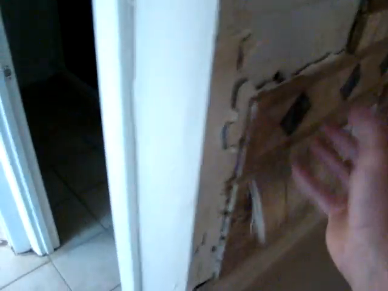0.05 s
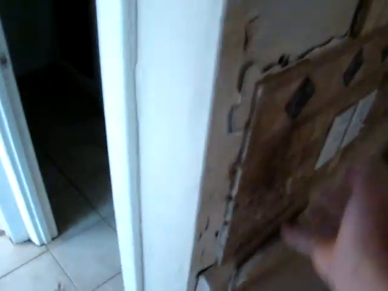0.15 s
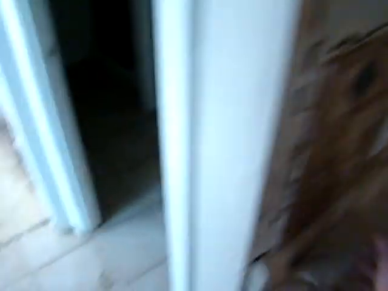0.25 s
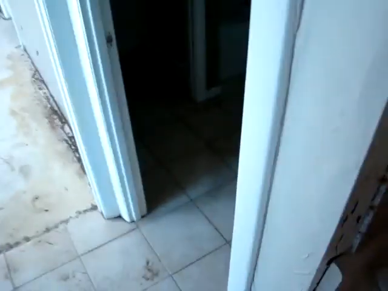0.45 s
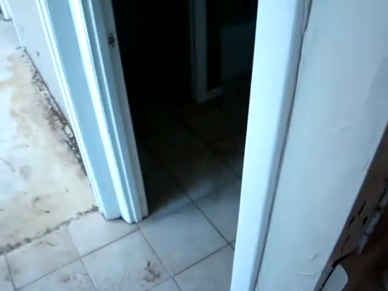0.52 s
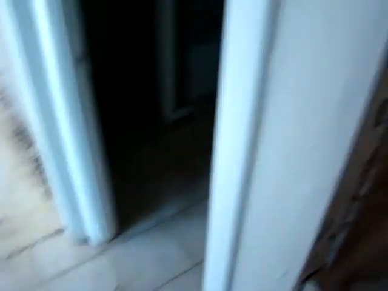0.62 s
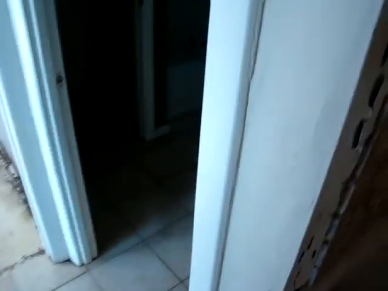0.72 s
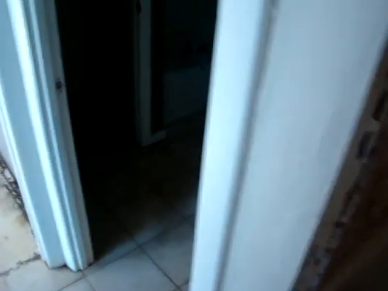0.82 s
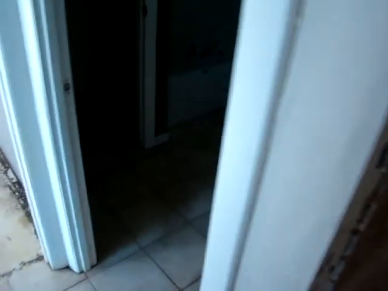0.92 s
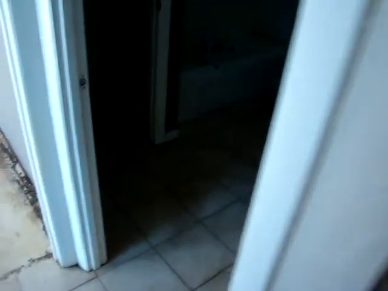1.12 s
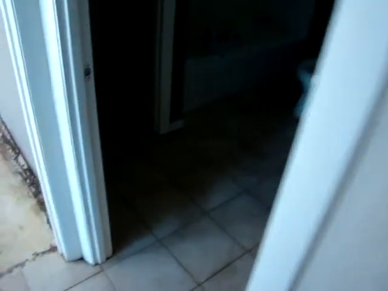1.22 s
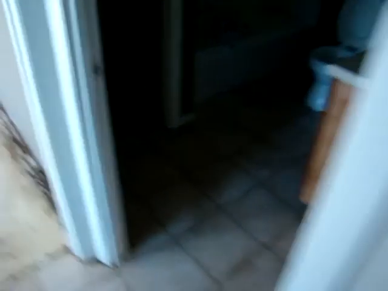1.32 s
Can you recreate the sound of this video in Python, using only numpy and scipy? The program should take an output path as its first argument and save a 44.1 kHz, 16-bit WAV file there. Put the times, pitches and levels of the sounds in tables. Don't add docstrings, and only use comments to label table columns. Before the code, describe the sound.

Close to a hissy small camera microphone, faint rubbing and crumbling mortar lead to a sudden tile crack and slightly overloaded crash, pieces bouncing again, then a long hollow indoor reverberation with a few gritty ticks.

```python
import sys
import numpy as np
from scipy import signal
from scipy.fft import rfft, irfft, next_fast_len
from scipy.io import wavfile
from scipy.ndimage import uniform_filter1d

SR = 44100
rng = np.random.default_rng(int(sys.argv[2]) if len(sys.argv) > 2 else 0)


def level_to_linear(level):
    exponent = np.asarray(level, float) / 20
    return 10 ** exponent


def digitize_waveform(pressure):
    field = np.atleast_2d(pressure).T
    bounded = np.clip(field, -1, 1)
    quanta = np.round(bounded * 32767).astype(np.int16)
    wavfile.write(sys.argv[1], SR, quanta)


N = 59535


def unit(x):
    return x / np.sqrt(np.mean(x ** 2) + 1e-20)


def along(points, hz):
    f, v = np.transpose(points)
    return np.interp(np.log(hz + 1), np.log(f + 1), v)


def filtered(x, response):
    m = next_fast_len(len(x) + 8192)
    return irfft(rfft(x, m) * response(np.fft.rfftfreq(m, 1 / SR)), m)[:len(x)]


def noise(colour):
    return unit(filtered(rng.standard_normal(N), lambda hz: level_to_linear(along(colour, hz))))


def causal(colour, tilt_db, size=4096):
    hz = np.fft.rfftfreq(size, 1 / SR)
    level_db = np.maximum(along(colour, hz), -70) + tilt_db * np.log2((hz + 50) / 1000)
    cepstrum = irfft(np.log(level_to_linear(level_db)), size)
    cepstrum[1:size // 2] *= 2
    cepstrum[size // 2 + 1:] = 0
    click = irfft(np.exp(rfft(cepstrum)), size)[:size // 2]
    return click / np.abs(click).max()


def tail(t60s, build_s):
    hz, t, z = signal.stft(rng.standard_normal(N), SR, nperseg=1024)
    decay = level_to_linear(-60 * t / along(t60s, hz)[:, None])
    h = signal.istft(z * decay, SR, nperseg=1024)[1][:N]
    h = h * (1 - np.exp(-np.arange(N) / (SR * build_s)))
    return h / np.linalg.norm(h)


def add(track, s, x):
    part = track[round(s * SR):][:len(x)]
    part += x[:len(part)]


def resonances(f, modes):
    return sum(level_to_linear(db) * 1j * f * w / (c * c - f * f + 1j * f * w) for c, w, db in modes)


def hall(f):
    # f/Hz, width/Hz, level/dB
    hall_modes = [(162, 14, 4), (252, 12, 9)]
    cut_hz = 155
    return (1j * f / (cut_hz + 1j * f)) * (1 + resonances(f, hall_modes))


def smash():
    blow_s = [.1385, .1495, .2495, .2645, .2692, .2732, .2772, .2855, .2955, .33, .4012, .4063, .415, .424,
              .435, .47, .497, .55]
    # level/dB, brightness/(dB/octave), rattle/dB, room/dB
    blows = [(-34, -2.5, 1.5, 5.5), (-34.5, 4, -12, 3.5), (-21, -4.5, 6, -2.5), (-4, -1, 8, 1.5),
             (-1.5, 1, -0.5, 1), (-9.5, 0.5, 7, 4.5), (-8.5, -0.5, 6, 0.5), (-5.5, 0, 5.5, 2.5),
             (-5, 0.5, 7, 3.5), (-9.5, -1, -12.5, -17), (-5, 1, 1.5, -5.5), (-7.5, 0.5, -0.5, -8.5),
             (-10, 1.5, 8, 0), (-11, -2, 3.5, 0), (-11.5, -0.5, 8.5, -5.5), (-12, -2, 10.5, -20),
             (-22, 0, 5, -14), (-32, -3, -9, -15)]
    # f/Hz, level/dB
    slab = [(35, -79), (60, -36), (246, -8.5), (362, -5), (521, -3), (871, -2.5), (1400, -1.5), (2710, -11),
            (10000, -32.5), (13000, -77.5), (22000, -120)]
    # f/Hz, level/dB
    pieces = [(35, -64), (60, -46), (257, -20), (600, -13), (1300, -9), (2150, 1), (3000, -8), (10000, -35)]
    # f/Hz, width/Hz, level/dB
    slab_modes = [(458.5, 9.2, -4), (644, 23, -7), (821, 19, -4.5), (929, 15, -3), (1172, 11, 3),
                  (1510, 15, -29), (2266, 12, -14)]
    # f/Hz, t60/s
    house = [(60, 1.1), (160, 0.82), (200, 0.84), (250, 1.21), (350, 1.294), (700, 1.417), (1500, 1.34),
             (3000, 1.113), (6000, 0.82), (10000, 0.76)]
    broken_s, rattle_t60_s, build_s, modes_db = .39, 0.057, 0.004, -1
    out, t = np.zeros(N), np.arange(SR // 10) / SR
    for s, (db, tilt_db, rattle_db, wet_db) in zip(blow_s, blows):
        clap = -causal(slab if s < broken_s else pieces, tilt_db)
        rattle = rng.standard_normal(len(t)) * rng.exponential(size=len(t))
        rattle = rattle * level_to_linear(-60 * t / rattle_t60_s)
        rattle = rattle / np.linalg.norm(rattle)
        add(out, s, level_to_linear(db) * clap)
        add(out, s, level_to_linear(db + rattle_db) * signal.fftconvolve(clap, rattle))
        add(out, s, level_to_linear(db + wet_db + 9.5) * signal.fftconvolve(clap, tail(house, build_s)))
    return filtered(out, lambda f: (1 + level_to_linear(modes_db) * resonances(f, slab_modes)) * hall(f))


def snaps():
    snap_s = [.1363, .1385, .150, .1815, .184, .2476, .2525, .8835, .8872, .8905, .8935, .9535, .191, .2445]
    snap_length_s = [.001, .006, .007, .003, .008, .002, .005, .003, .002, .0025, .0015, .001, .04, .003]
    snap_tilt_db = [1, 3, 1, 2, 0, -1, 3, 1.5, 3, 0, .5, 1, 2, 1]
    # click/dB, crumble/dB
    snap_levels = [(-19, -58), (-37.5, -33), (-38, -36.5), (-40, -26), (-37, -27.5), (-3.5, -10.5),
                   (-33, -15.5), (-24, -27.5), (-19.5, -54), (-16.5, -27.5), (-21, -37), (-38, -53),
                   (-47, -35), (-42.5, -37)]
    # f/Hz, level/dB
    snap_colour = [(60, -45), (300, -26), (1000, -14), (2500, -3), (4200, 3), (6500, 0), (8000, -5),
                   (9600, -1)]
    click_t60_s, wet_db, wet_t60_s, wet_build_s = .002, -9, .3, 0.0013
    out, t = np.zeros(N), np.arange(2000) / SR
    for s, length_s, tilt_db, (click_db, db) in zip(snap_s, snap_length_s, snap_tilt_db, snap_levels):
        chance = rng.standard_normal((3, len(t)))
        grit = level_to_linear(db) * chance[0] * chance[1] / (1 + (t / length_s) ** 6)
        grit += level_to_linear(click_db + 1.5 - 60 * t / click_t60_s) * chance[2]
        add(out, s, np.convolve(grit, causal(snap_colour, tilt_db)))
    echo = signal.fftconvolve(out, tail([(500, wet_t60_s)], wet_build_s))[:N]
    return out + level_to_linear(wet_db) * echo


def shard():
    # t/s, level/dB
    hit_s, hit_db = (.183, -37)
    # f/Hz, level/dB, t60/s
    shard_modes = [(825, 8.5, 0.066), (2090, 3.5, 0.46), (2950, -2, 0.18), (3203, -13, 0.54),
                   (3180, -1.5, 0.32), (3930, -7, 0.3), (5200, -20, 0.14)]
    onset_s = 0.0029
    out, t = np.zeros(N), np.arange(SR // 2) / SR
    wander = rng.standard_normal((2, len(shard_modes), len(t)))
    wander = unit(uniform_filter1d(uniform_filter1d(wander, 200), 100))
    ring = np.zeros(len(t))
    for (hz, db, t60_s), size, phase in zip(shard_modes, *wander):
        level = level_to_linear(db - 60 * t / t60_s + 4 * size)
        ring += level * np.sin(2 * np.pi * hz * t + 1.2 * phase)
    add(out, hit_s, level_to_linear(hit_db) * ring * (1 - np.exp(-t / onset_s)))
    return out


def hand(t):
    # t/s, level/dB, f/Hz
    grips = [(0.046, -58, 45), (0.147, -54.5, 90), (0.171, -57, 57), (.27, -61, 44.7), (.40, -52, 35),
             (.47, -65, 55.6), (.95, -61.5, 49.6), (0.998, -63, 70), (1.064, -62, 60), (0.252, -16, 377),
             (.2575, -18.5, 350), (1.07, -61, 140), (1.001, -59, 110)]
    out = np.zeros(N)
    for s, db, hz in grips:
        swell = np.exp(-.5 * ((t - s) * hz / 0.69) ** 2)
        out += level_to_linear(db) * swell * np.sin(2 * np.pi * hz * (t - s))
    return out


def swishes(t):
    # middle t/s, half length/s, level/dB
    swells = [
        (0.062, .025, -49),
        (.945, 0.08, -55),
    ]
    # f/Hz, level/dB
    swish_colour = [(300, -0.5), (1500, -22), (3700, -1.5), (7000, 1.5), (10000, -1.5)]
    swell = sum(level_to_linear(db) * np.exp(-.5 * ((t - s) / half_s) ** 2) for s, half_s, db in swells)
    return swell * noise(swish_colour)


def background():
    # f/Hz, level/dB
    bustle_colour = [(30, -32), (100, -6), (260, 4.5), (480, 7), (1000, -1.5), (2000, -5), (5000, -27.5),
                     (10000, -27)]
    # f/Hz, level/dB
    hiss_colour = [(30, -2.5), (300, -16), (3000, -3), (10000, -10.5)]
    bustle_db, bustle_t60_s, still_db, hiss_db = -56, 3.4, -60, -56
    t = np.arange(N) / SR
    fade = level_to_linear(bustle_db - 60 * t / bustle_t60_s) + level_to_linear(still_db)
    bustle = fade * unit(filtered(noise(bustle_colour), hall))
    return bustle + swishes(t) + hand(t) + level_to_linear(hiss_db) * noise(hiss_colour)


def holes(x):
    from_hz, rarity, loss_db = 5000, 1.5, -18
    hz, _, z = signal.stft(x, SR, nperseg=256)
    field = rng.standard_normal(z.shape)
    field = unit(uniform_filter1d(uniform_filter1d(field, 5, axis=0), 4, axis=1))
    lost = (field > rarity) & (hz[:, None] > from_hz)
    return signal.istft(z * level_to_linear(loss_db * lost), SR, nperseg=256)[1][:N]


def below(hz, edge_hz):
    return np.clip((edge_hz - hz) / 160 + .5, 0, 1)


def starved(x):
    # t/s, length/s, from f/Hz, to f/Hz, loss/dB
    dips = [
        (.1235, .008, 3000, 11000, -40),
        (.147, .015, 6100, 7900, -35),
        (.162, .016, 5500, 11000, -30),
        (.233, .011, 3300, 11000, -22),
        (.258, .005, 4300, 11000, -18),
        (.382, .012, 6500, 8300, -18),
        (.898, .016, 7000, 11000, -30),
        (.904, .010, 5000, 7000, -35),
        (.897, .007, 4500, 5600, -25),
        (.962, .008, 5500, 7000, -22),
    ]
    t = np.arange(N) / SR
    for s, length_s, from_hz, to_hz, loss_db in dips:
        gate = np.exp(-(2 * (t - s) / length_s - 1) ** 6 / 20)
        band = filtered(x, lambda hz: below(hz, to_hz) - below(hz, from_hz))
        x = x - (1 - level_to_linear(loss_db)) * gate * band
    return x


def scene():
    return (smash() + snaps() + shard() + background())[None]


def low_pass(x):
    return signal.sosfilt(signal.butter(12, 15780, fs=SR, output="sos"), x)


def record(dry):
    knee, hardness, ceiling = .74, 4, .69
    low_cut_hz, top_hz = 35, 10035
    x = dry[0] / (1 + np.abs(dry[0] / knee) ** hardness) ** (1 / hardness)
    x = filtered(holes(x), lambda hz: below(hz, top_hz) * 1j * hz / (low_cut_hz + 1j * hz))
    mix = np.clip(starved(x), -ceiling, ceiling)[None]
    return low_pass(mix)


dry = scene()
out = record(dry)
digitize_waveform(out)
```